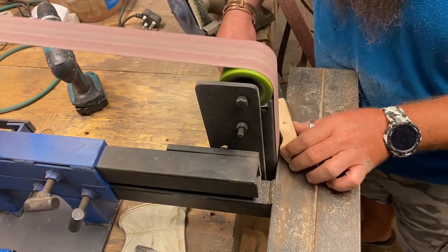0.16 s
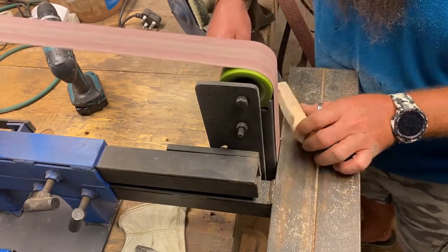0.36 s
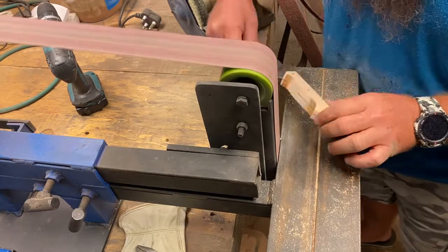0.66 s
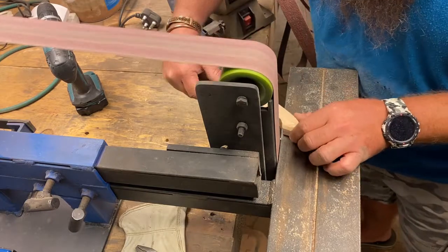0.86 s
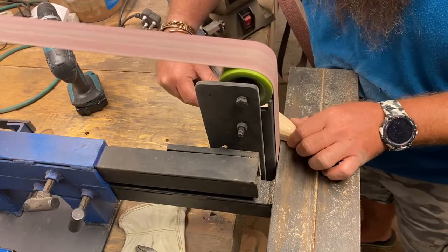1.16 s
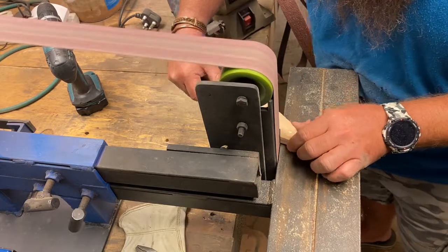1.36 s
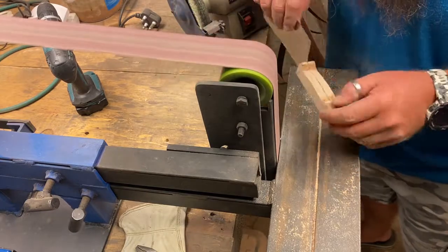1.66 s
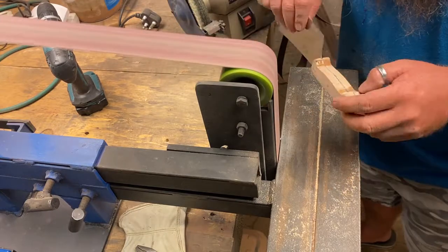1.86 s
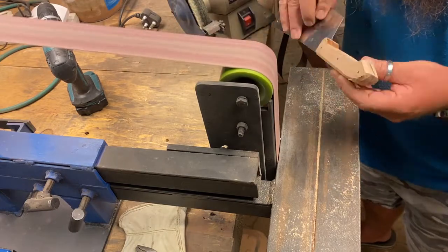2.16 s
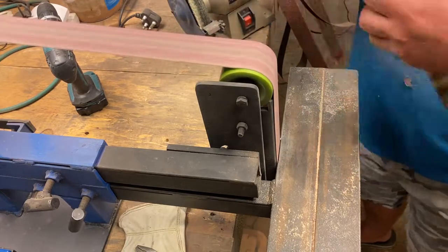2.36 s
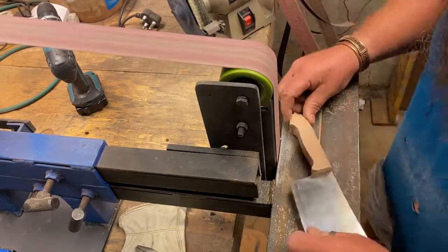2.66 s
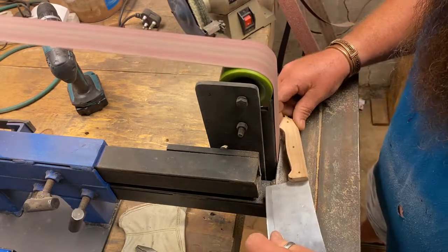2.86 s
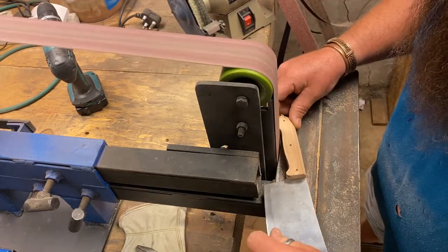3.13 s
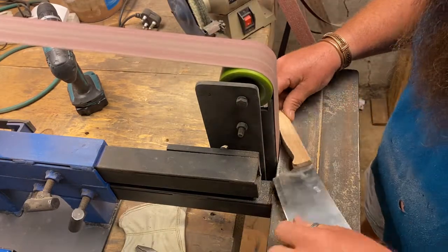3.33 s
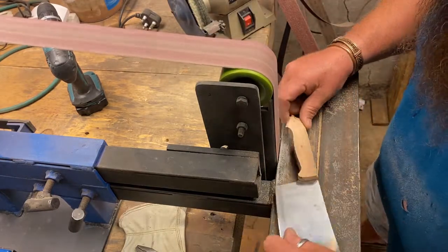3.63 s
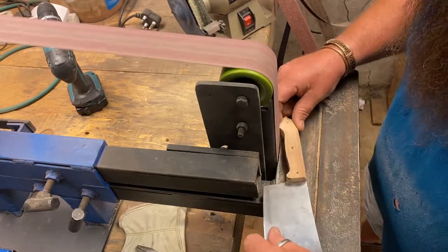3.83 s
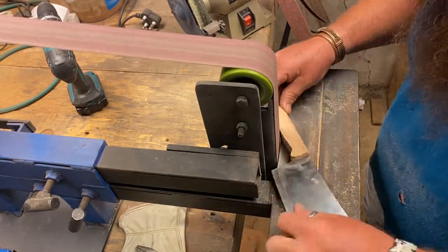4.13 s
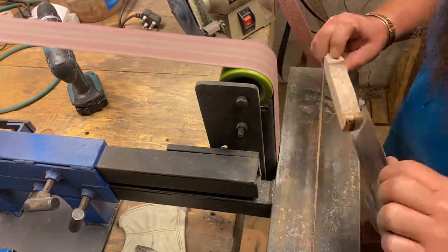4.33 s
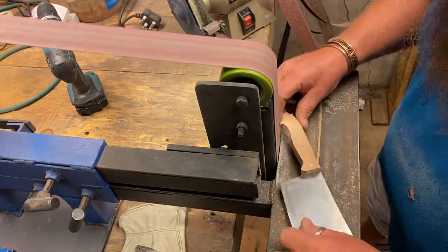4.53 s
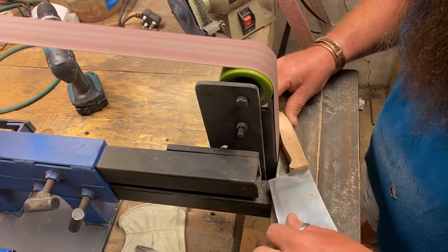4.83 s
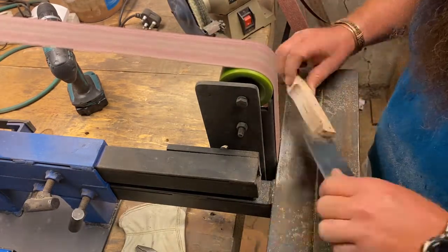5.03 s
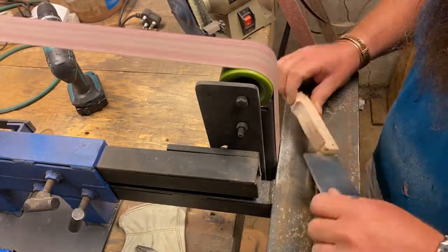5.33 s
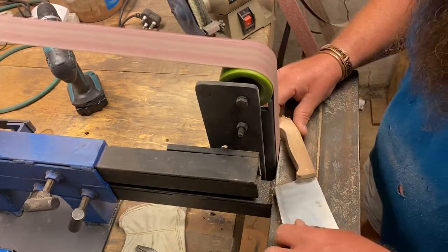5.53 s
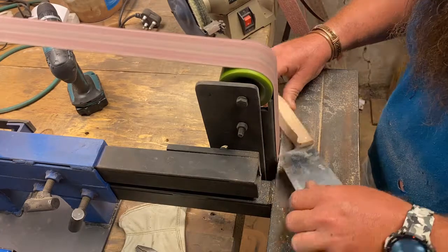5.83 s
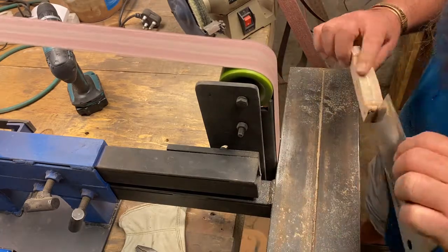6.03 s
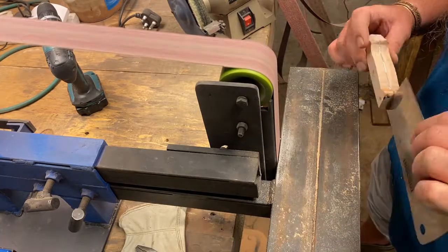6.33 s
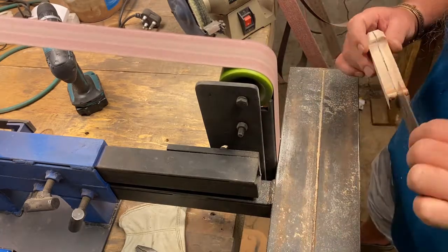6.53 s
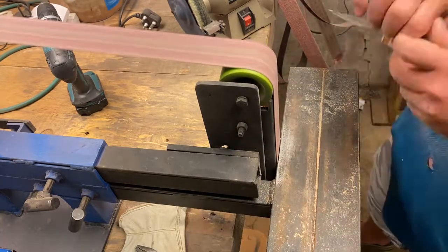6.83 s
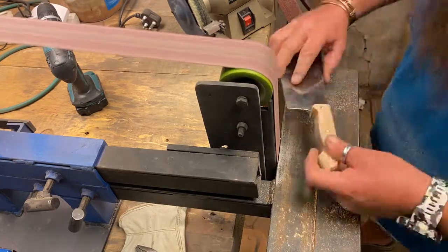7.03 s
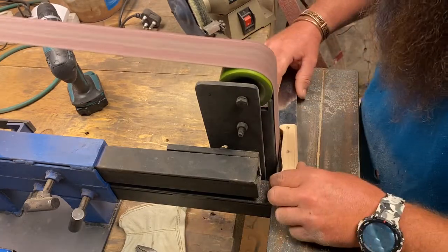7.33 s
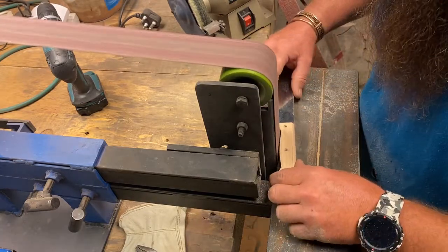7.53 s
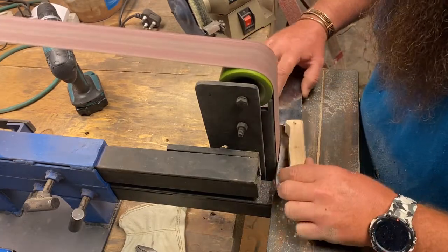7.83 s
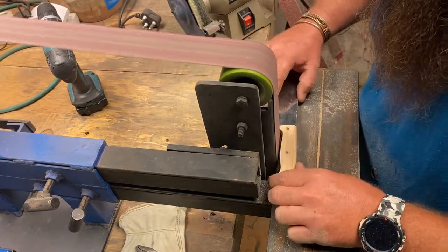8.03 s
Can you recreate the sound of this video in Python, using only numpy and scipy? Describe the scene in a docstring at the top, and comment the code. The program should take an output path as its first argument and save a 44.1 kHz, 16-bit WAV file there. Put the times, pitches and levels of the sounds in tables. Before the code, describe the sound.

A belt grinder runs throughout, close and nearly centred, in a workshop. Its motor gives a thick hum around 400 Hz with a slow throb; wheels drone near 300 Hz and add a dense, wavering whine up into the treble. Bearings growl in the midrange, the stand rumbles faintly, and the belt hisses widely with short flapping flutters. Wood is already on the belt at 0 and lifts at 0.4 s, with small bites in the rasp. A short stroke follows at 1.2-1.5 s, then free running until 3.1. Four firmer strokes come at 3.1-3.4, 3.8-4.2, 4.7-5.0 and 5.6-5.9 s, each a bright gritty hiss growing with pressure, ending quickly, and sagging the pitch slightly. The whole level dips briefly at 4.8 and 5.7. The grinder runs free until strokes at 7.3-7.7, with sharper bites, and from 8.0 s; the machine never stops.

```python
"""Belt grinder and a wooden handle

A belt grinder runs in a workshop, close to the microphones, while a wooden knife handle touches the belt in short strokes.
The motor hums on its shaft orders and throbs against its field; wheel tones drone, whine and flutter, all as sine partials.
Filtered noise makes the growl of the bearings, the rumble of the stand and the hiss of the belt.
Each stroke adds a burst of gritty noise and drags the shaft, with all that it drives, down a little."""
import sys
import numpy as np
from scipy import signal
from scipy.fft import rfft, irfft, next_fast_len
from scipy.io import wavfile
from scipy.ndimage import uniform_filter1d, map_coordinates

SR = 44100
rng = np.random.default_rng(int(sys.argv[2]) if len(sys.argv) > 2 else 0)


def int16_out(signal):
    """Quantize to a 16-bit WAV file."""
    q = np.round(np.clip(np.atleast_2d(signal).T, -1, 1) * 32767)
    wavfile.write(sys.argv[1], SR, q.astype(np.int16))


N = 360738

# shaft speed in turns per second: running free, and the speed at which the wheel tones are listed
IDLE_HZ, NOMINAL_HZ = 49.294, 49.25
WHINE_HZ = 299.72  # pitch of the whining wheel at nominal speed
# the hand builds up its pressure slowly and lifts quickly
PRESS_S, LIFT_S = 0.314, 0.089
# the wood is pressed on the belt: start t/s, end t/s, shaft sag at full pressure/(turns per s),
# hiss level before touch and bites/dB
STROKES = [(-.05, 0.419, 0.39, -31.5), (1.161, 1.461, 0.3, -29.5), (3.082, 3.439, 0.46, -29),
           (3.828, 4.237, 0.54, -28.5), (4.674, 5.044, .633, -29), (5.551, 5.908, .7, -30),
           (7.321, 7.731, 0.33, -30.5), (8.02, 8.398, .3, -27.5)]
# left-right likeness of the low machine noise: f/Hz, likeness (1 = the same in both channels)
GROWL_ALIKE = [(50, 0.77), (250, 1), (500, 0.92), (1000, 0.77), (2000, 0.6), (3000, 0.38)]


def amp(db):
    """Decibels to gain."""
    return np.exp(np.asarray(db) * (np.log(10) / 20))


def unit(x):
    """x scaled to rms 1."""
    return x / np.sqrt(np.mean(x ** 2) + 1e-20)


def clock():
    """The time of every sample in seconds."""
    return np.arange(N) / SR


def along(points, hz):
    """(Hz, value) points read off on a log frequency axis."""
    f, v = np.transpose(points)
    return np.interp(np.log(hz + 1), np.log(f + 1), v)


def curves(rows):
    """One value per sample for each column after the time."""
    s, *columns = np.transpose(rows)
    return [np.interp(clock(), s, column) for column in columns]


def wobble(rate, size=64):
    """A smooth random curve, rate knots a second, worked out every size samples and joined by lines."""
    knots = rng.standard_normal(2048)
    places = np.arange(N // size + 2) * size * rate / SR
    coarse = map_coordinates(knots, [places], mode="wrap")
    steps = np.diff(coarse)[:, None] * (np.arange(size) / size)
    return (coarse[:-1, None] + steps).ravel()[:N]


def filtered(x, response):
    """x filtered by a response given as a function of frequency."""
    m = next_fast_len(N + SR // 2)
    return irfft(rfft(x, m) * response(np.fft.rfftfreq(m, 1 / SR)), m)[..., :N]


def coloured(pair, spectrum, alike):
    """Two unrelated noises become a stereo noise of rms 1 with this spectrum and left-right likeness."""
    def response(hz):
        turn = np.arccos(np.clip(along(alike, hz), -1, 1)) / 2
        return amp(along(spectrum, hz)) * np.array([np.cos(turn), np.sin(turn)])

    mid, side = filtered(pair, response)
    return unit(np.array([mid + side, mid - side]))


def patchy(x, depth_db, size=(5, 12)):
    """Noise whose level flickers in small patches, size in bins of (frequency, time)."""
    z = signal.stft(x, nperseg=256)[2]
    patches = rng.standard_normal(z.shape[1:])
    patches = uniform_filter1d(patches, size[0], axis=0)
    patches = uniform_filter1d(patches, size[1], axis=1)
    return signal.istft(z * amp(depth_db * unit(patches)), nperseg=256)[1][:, :N]


def tone(cycles, db, side_db):
    """A partial with its mid at rms db; reflections make it reach the two microphones out of step."""
    phase = (2 * np.pi * (cycles - np.floor(cycles))).astype(np.float32)
    mid = np.sin(phase)
    # the side is relative to the mid, a quarter cycle ahead or behind
    side = np.float32(rng.choice([-1, 1]) * amp(side_db)) * np.cos(phase)
    return np.float32(np.sqrt(2) * amp(db)) * np.array([mid + side, mid - side])


def since(cycles, s):
    """Cycles counted from the moment s."""
    return cycles - np.interp(s, clock(), cycles)


def pressure(start, end):
    """How hard one stroke presses, 0-1: a slow ramp up times a quick ramp down."""
    press = np.clip((clock() - start) / PRESS_S, 0, 1)
    lift = np.clip((end - clock()) / LIFT_S, 0, 1)
    return press * lift


def motor(turns, shake_db=0.27, order=8):
    """Shaft orders hum; the field's steady tone beats with the strongest, faster as the rotor is slowed."""
    # motor hum: shaft order, mean level/dB, side level relative to mid/dB
    hum = [(4, -34.5, -55), (8, -26, -27.5), (12, -35, -40), (16, -52.5, -5), (20, -48, -17),
           (24, -42.5, -7), (28, -43.5, -12), (32, -52.5, -13), (36, -59, 1), (40, -58, -6),
           (44, -51.5, -10), (48, -51.5, -5)]
    field_hz, in_step_s = 398.989, 2.19  # the field is in step with the rotor at this moment
    slip = since(field_hz * clock() - order * turns, in_step_s)
    sound = tone(order * turns + slip, -38.5, side_db=-21)
    for k, db, side_db in hum:
        shaken_db = db + shake_db * np.sqrt(k / order) * wobble(28)
        sound = sound + tone(k * turns, shaken_db, side_db)
    return sound


def wheels(turns, waver_db=2, drift=0.072):
    """Wheel and bearing tones follow the shaft, each wavering as the belt creeps (drift in cycles)."""
    # tones of wheels and bearings: f/Hz at nominal speed, mean level/dB, side level relative to mid/dB
    tones = [(405.5, -51, -30), (595.5, -62, -15), (599.6, -47.5, -21), (636, -54, -17), (644, -55.5, -10),
             (700, -75, -10), (799, -46, -14), (900, -49, -10), (907, -41.5, -27), (1004, -54, -13),
             (1081, -48, -7), (1094, -46, -12), (1200, -46.5, -11), (1207, -52.5, -11), (1204, -43.5, -9),
             (1295, -55, -7), (1310, -50, -7), (1503, -53, -6), (1501, -47, -7), (1605, -49, -12),
             (1577, -49, -8), (1797, -49.5, -3), (1987, -50.5, 1), (2110, -54.5, -1), (2400, -55, -10),
             (2666, -49.5, -8), (2780, -54, -1), (3300, -58, 9.5)]
    return sum(tone(hz / NOMINAL_HZ * turns + rng.random() + drift * wobble(4),
                    db + waver_db * wobble(7), side_db)
               for hz, db, side_db in tones)


def drones(turns, level_db=-3.0):
    """Low tones of three wheels of nearly equal size beat slowly, drifting in and out of step."""
    # wheel drones: f/Hz at nominal speed, level before level_db/dB, side level relative to mid/dB
    tones = [(299.72, -48, -45), (300.9, -46, -45), (301.76, -46.7, -45)]
    in_step_s = 2.01
    run_s = since(turns, in_step_s) / NOMINAL_HZ
    return sum(tone(hz * run_s, db + level_db, side_db) for hz, db, side_db in tones)


def whine(cycles, sag, waver_db=2.6, level_db=1.5):
    """Overtones of one wheel sing and droop with the belt; timing jitter blurs the highest lines."""
    # wavering lines: multiple of the wheel's pitch, level before level_db/dB, side level relative to mid/dB
    overtones = [(6, -54, -2), (8, -53, -10), (9, -52, -10), (10, -55, -4), (11, -56, 0), (13, -53.5, 2),
                 (16, -54.5, 2), (17, -57, -1), (18, -52.5, 1), (19, -57, -8), (23, -60, -4),
                 (26, -58, -10), (32, -62, -11), (35, -59, -8), (36, -51.5, -20), (38, -61, -11),
                 (41, -61, -9), (42, -58, -8), (44, -58, -9), (45, -57, -11), (46, -56, -13),
                 (47, -60, -11), (49, -55, -7), (50, -53.5, -9), (52, -58, -4)]
    # strongest lines: multiple of the pitch, trim/dB, level per turn a second of sag/dB,
    # side level relative to mid/dB
    swelling = [(12, 0.5, -7, -21), (14, 2, -16, 0), (15, 2.5, -5, -6)]
    # their swells: t/s, then the level before trim and sag of each of these lines/dB
    swells = [(0.0, -43, -47, -41), (0.23, -43, -54, -39.5), (0.43, -43, -46, -41),
              (1.05, -43.5, -49, -44.5), (2.41, -40.5, -50, -41), (2.96, -49, -42, -44.5),
              (3.19, -47, -46, -44), (4.76, -49, -46, -45), (4.85, -52, -55, -42), (5.49, -48, -43, -46),
              (5.76, -47, -49, -40), (6.06, -45, -50, -46), (8.07, -49, -48, -49), (8.18, -53, -59, -47)]

    def partial(order, db, side_db):
        jitter = 0.002 * wobble(25)  # cycles of the wheel's pitch
        return tone(round(order) * (cycles + jitter) + rng.random(), db, side_db)

    steady = sum(partial(order, db + level_db + waver_db * wobble(3.04), side_db)
                 for order, db, side_db in overtones)
    strongest = sum(partial(order, db + trim_db + load_db * sag, side_db)
                    for (order, trim_db, load_db, side_db), db in zip(swelling, curves(swells)))
    return steady + strongest


def flutter(turns, burst_db=6, drift=0.25):
    """The belt flaps on its wheels, so that these tones come in short, uneven bursts (drift in cycles)."""
    # fluttering tones: f/Hz at nominal speed, level/dB, side level relative to mid/dB
    tones = [(1196.5, -43.5, -12), (1801, -48.5, -7), (2390, -49, -12), (5590, -56.5, -6)]
    burst = lambda: unit(amp(burst_db * np.tanh(wobble(24))))
    return sum(burst() * tone(hz / NOMINAL_HZ * turns + drift * wobble(20), db, side_db)
               for hz, db, side_db in tones)


def bearings(level_db=-30.5, repeat=0.25, flutter_db=1.0):
    """Rolling noise that partly repeats with each turn of the idler wheel, coloured by the steel frame."""
    # spectrum of the growl: f/Hz, relative level per Hz/dB
    growl = [(25, -20), (60, -26), (110, -21), (250, -12.5), (450, -10), (620, -6), (760, -10), (880, -6.5),
             (1130, -1.5), (1400, -6), (1720, -2), (2100, -7), (2500, -6), (3300, -17.5)]
    idler_hz = 100.1
    comb = lambda hz: 1 / (1 - repeat * np.exp(-2j * np.pi * hz / idler_hz))
    rolling = filtered(rng.standard_normal((2, N)), comb)
    return amp(level_db + flutter_db * wobble(16)) * coloured(rolling, growl, GROWL_ALIKE)


def rumble(level_db=-59.0, lumps_db=8.0):
    """The stand shakes in faint, uneven lumps of low noise."""
    # spectrum of the rumble: f/Hz, relative level per Hz/dB
    spectrum = [(20, -11), (45, -1), (60, -6), (110, -1), (170, -7), (300, -30), (1000, -70)]
    lumps = amp(lumps_db * np.tanh(wobble(36)))
    shaking = coloured(rng.standard_normal((2, N)), spectrum, GROWL_ALIKE)
    return amp(level_db) * unit(lumps * shaking)


def belt(cycles, level_db=-32.5, buzz=0.22, flutter_db=0.6, flicker_db=3.5, split_hz=7300):
    """The belt hisses over the platen, pulsing with the whining wheel; the treble flickers."""
    # spectrum of the hiss: f/Hz, relative level per Hz/dB
    spectrum = [(600, -19), (2000, -10.5), (2900, -1), (3350, 3), (4000, -2), (4500, 2.5), (5000, -1),
                (5600, 1.5), (5850, -5), (7000, -10.5), (8000, -5), (9000, -13), (10400, -5), (15800, -10)]
    # its left-right likeness: f/Hz, likeness
    alike = [(2000, 0.46), (3400, .1), (5500, 0.23), (7000, .1), (8500, 1), (10500, 1), (15000, 1)]
    rub = rng.standard_normal((2, N)) * (1 + buzz * np.sin(2 * np.pi * cycles))
    body = filtered(rub, lambda hz: hz < split_hz)
    hiss = body + patchy(rub - body, flicker_db)
    return amp(level_db + flutter_db * wobble(22)) * coloured(hiss, spectrum, alike)


def sanding(chatter_db=1.6, patch_db=2):
    """Countless grits tear at the wood while it touches, catching now here, now there: patchy noise."""
    # spectrum of the sanding: f/Hz, relative level per Hz/dB
    spectrum = [(1500, -12), (4000, -11), (6000, -5), (7200, -7), (8500, -3), (9400, 3.5), (10300, 1.5),
                (11600, -3), (12600, -3), (13900, 3.5), (15800, -1)]
    # its left-right likeness: f/Hz, likeness
    alike = [(5000, .3), (7800, 0.34), (9000, 1), (10500, 1), (11600, 0.83), (14000, 0.9), (15500, .6)]
    # an edge of the wood bites into the belt: t/s, extra hiss level/dB
    bites = [(.14, 9), (.37, 5), (3.18, 4), (3.385, 4), (4.805, 6.5), (5.68, 7), (7.365, 7), (7.66, 8)]
    touch_s, light_touch_db = 0.032, -4
    bite_rise_s, bite_fall_s = 0.037, 0.047
    strokes = 0
    for start, end, _, db in STROKES:
        contact = np.interp(clock(), [start, start + touch_s, end - LIFT_S, end], [0, 1, 1, 0])
        # the touch offset counts twice without pressure, once at full pressure
        touch_db = light_touch_db * (2 - pressure(start, end))
        strokes = strokes + contact * amp(db + touch_db)
    bite_db = sum(np.interp(clock(), [s - bite_rise_s, s, s + bite_fall_s], [0, db, 0])
                  for s, db in bites)
    grits = patchy(rng.standard_normal((2, N)), patch_db)
    return strokes * amp(bite_db + chatter_db * wobble(54)) * coloured(grits, spectrum, alike)


def scene(lean_db=0.12):
    """Each stroke slows the shaft and all that it drives; everything stands a touch left of centre."""
    sag = sum(depth * pressure(start, end) for start, end, depth, _ in STROKES)
    turns = np.cumsum(IDLE_HZ - sag) / SR
    wheel_cycles = turns * WHINE_HZ / NOMINAL_HZ
    tones = motor(turns) + wheels(turns) + drones(turns) + whine(wheel_cycles, sag) + flutter(turns)
    noises = bearings() + rumble() + belt(wheel_cycles)
    return (tones + noises + sanding()) * amp([[lean_db], [-lean_db]])


def record(dry):
    """The level drops abruptly twice and climbs back; nothing is kept above the band limit."""
    # level dips: t/s, depth/dB, time from onset to full recovery/s
    dips = [(4.815, 4.2, 0.31), (5.68, 4.5, 0.3)]
    top_hz = 15760
    dip_db = sum(np.interp(clock(), [s, s + 0.012, s + recovery], [0, depth_db, 0])
                 for s, depth_db, recovery in dips)
    return filtered(dry * amp(-dip_db), lambda hz: hz < top_hz)


dry = scene()
out = record(dry)
int16_out(out)
```